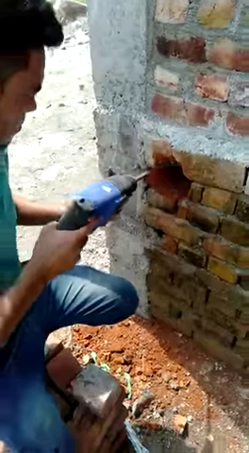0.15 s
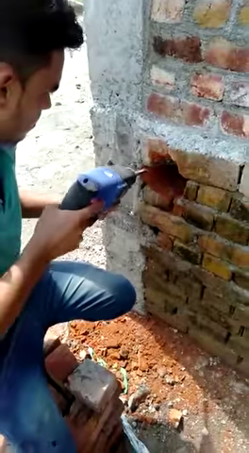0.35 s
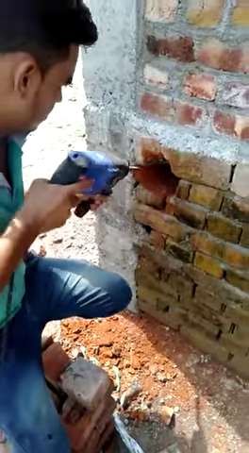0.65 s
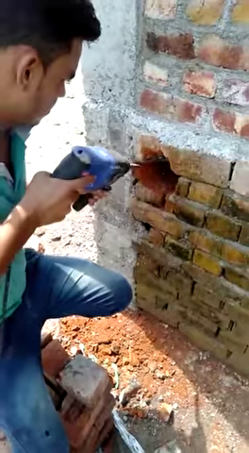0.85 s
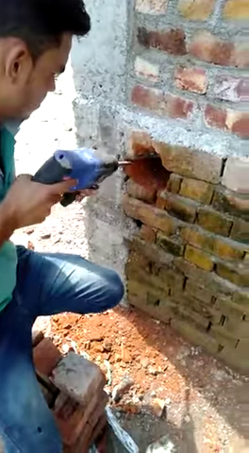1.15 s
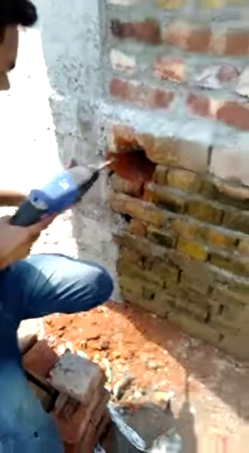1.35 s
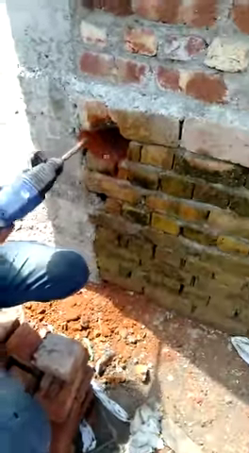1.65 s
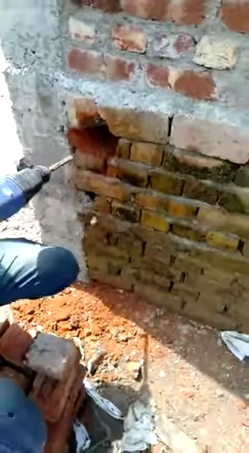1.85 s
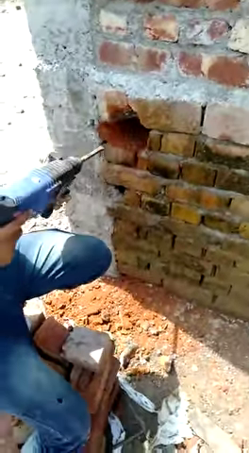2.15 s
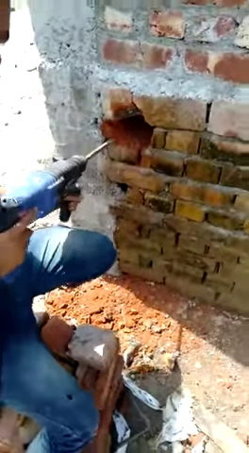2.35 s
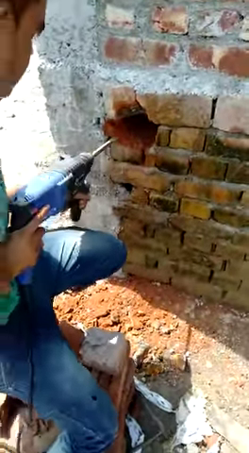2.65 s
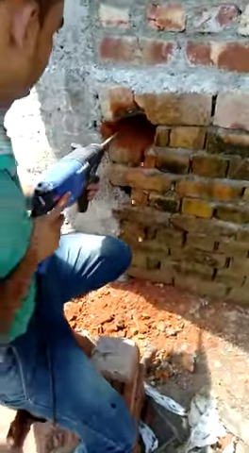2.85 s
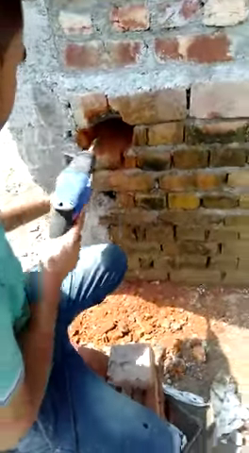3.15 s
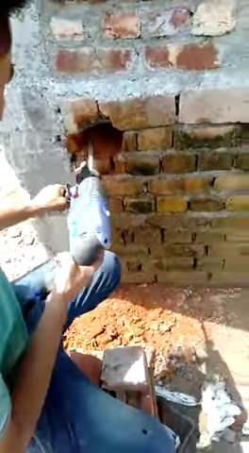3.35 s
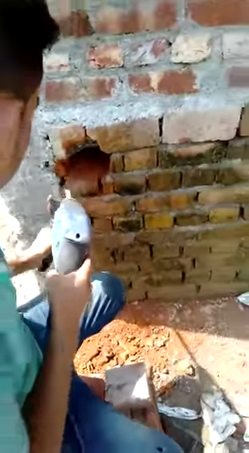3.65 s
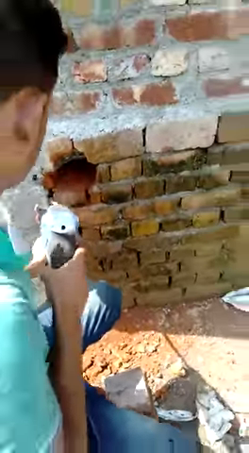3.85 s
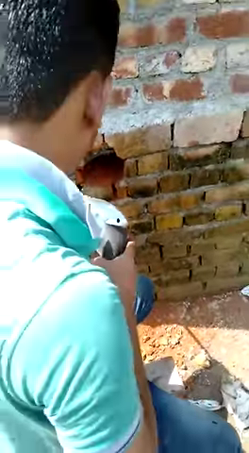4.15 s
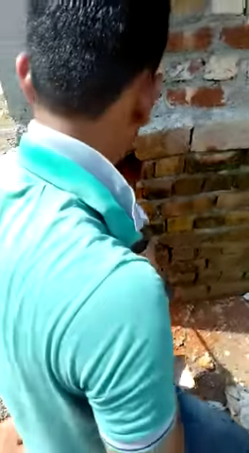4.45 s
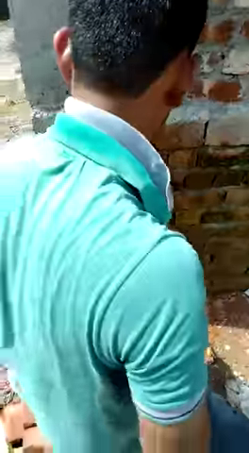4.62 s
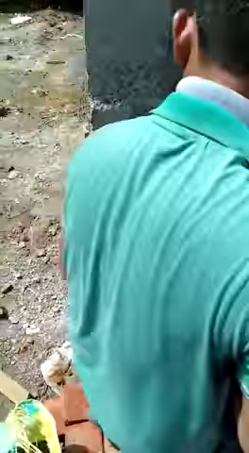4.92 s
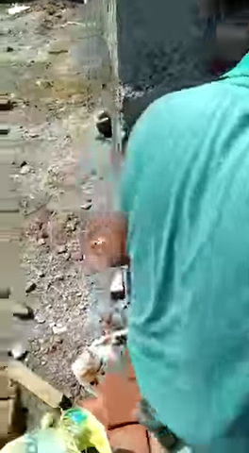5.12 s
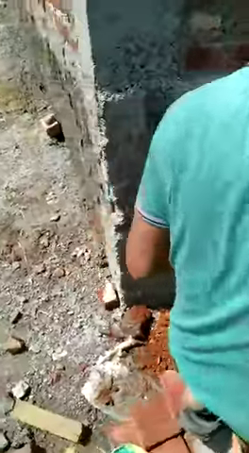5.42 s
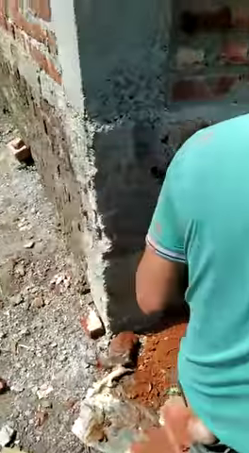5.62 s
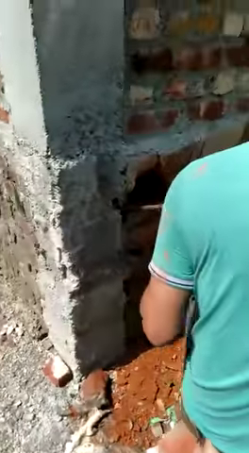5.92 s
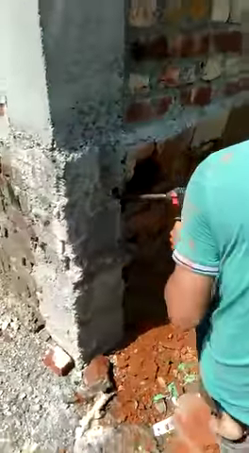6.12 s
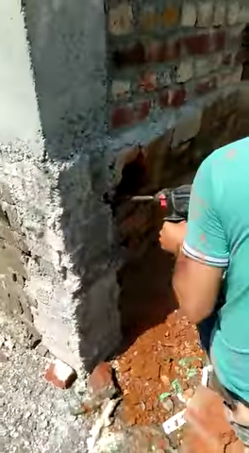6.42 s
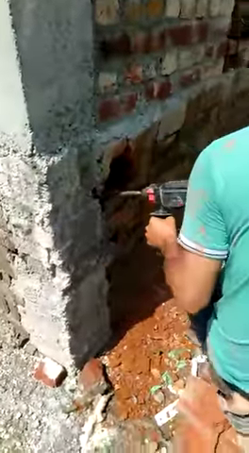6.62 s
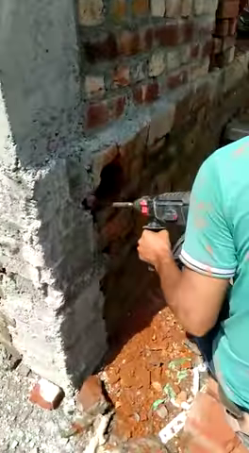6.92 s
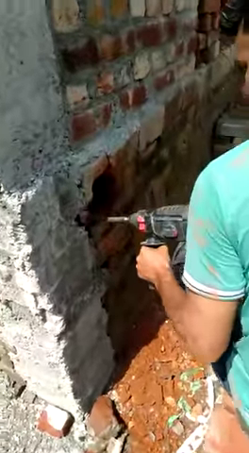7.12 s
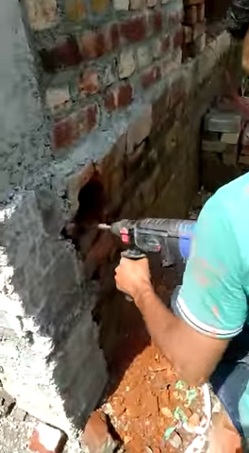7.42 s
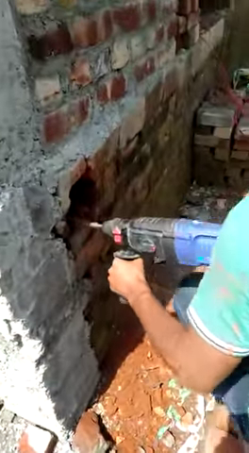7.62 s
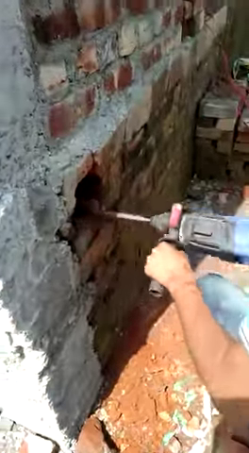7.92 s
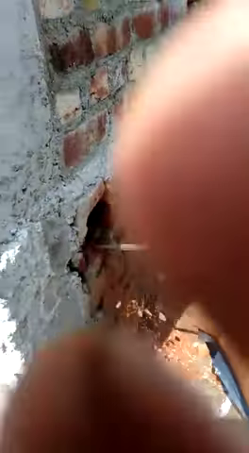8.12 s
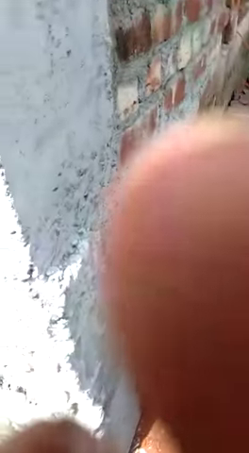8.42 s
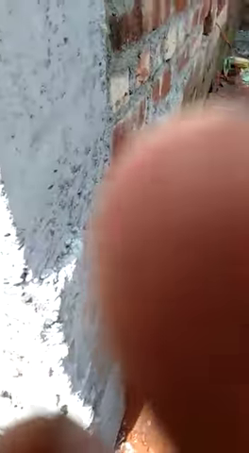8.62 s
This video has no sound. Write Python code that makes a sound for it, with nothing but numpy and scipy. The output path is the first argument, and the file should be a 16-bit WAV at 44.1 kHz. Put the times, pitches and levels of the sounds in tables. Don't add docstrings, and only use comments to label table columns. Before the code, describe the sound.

A handheld phone moves around an electric hammer drill on a brick wall in open air. Fast knocking, hard bit cracks and rattling gears slow, stop almost entirely, and surge again. The middle is labouring and muffled, with a faint gear whine and low gusts; then steady close chatter resumes. Release brings scattered clacks, a falling rattle, finger taps and a light breeze.

```python
import sys
import numpy as np
from scipy import signal
from scipy.fft import rfft, irfft, next_fast_len
from scipy.io import wavfile
from scipy.ndimage import uniform_filter1d

SR = 44100
rng = np.random.default_rng(int(sys.argv[2]) if len(sys.argv) > 2 else 0)


def int16_out(signal):
    q = np.round(np.clip(np.atleast_2d(signal).T, -1, 1) * 32767)
    wavfile.write(sys.argv[1], SR, q.astype(np.int16))


def voltage_ratio(decibels):
    exponent = np.asarray(decibels, float) / 20
    return 10 ** exponent


N = 386757
TIME = np.arange(N) / SR

# t/s, goal blow rate f/Hz, time constant/s
MOTOR = [(0, 67, .12), (.6, 65.7, .3), (1.2, 67, .2), (1.4, 30, .55), (1.68, 15, .25), (2.46, 68.5, .18),
         (2.85, 65.8, .08), (3.22, 51.5, .113), (3.88, 44, .33), (4.93, 79, .24), (5.33, 66.3, .17),
         (6.75, 65.9, .4), (7.43, 0, .75), (7.63, 14, .27)]
START_HZ, START_TURN = 36, 0.845
# t/s, lag/turns
LAG = [(0, -.05), (.15, 0), (.3, .25), (.65, .36), (1.4, .35), (1.7, .1), (1.9, -.05), (2.4, 0),
       (2.55, .28), (2.85, .09), (3.36, .09), (3.9, .03), (4.05, -.11), (4.35, -.29), (4.65, -.41),
       (5.2, -.49), (5.45, -.29)]
# t/s, share of repeating knock/0-1, crack above hiss level/dB, bite on brick level/dB
SEAT = [(0, 0.15, 12, 6), (.13, 0.1, 9, 4.5), (.3, 0.26, 5, 3), (.62, 0.68, 7.5, 4.5), (1.3, 0.75, 6, -2),
        (1.55, 0, 10.5, -0.5), (1.95, 0.02, 16, 19), (2.6, 0.24, 17, 9.5), (2.9, 0.25, 10.5, 4),
        (3.2, 0.23, 7, -4.5), (3.33, 0.25, 5, -3.5), (4.3, 0.12, 1, -4.5), (5.29, 0.34, 0, -7),
        (5.35, 0.3, 5, 2), (5.8, 0.33, 16, 7.5), (6.05, 0.56, 16, -1), (7.31, 0.6, 11.5, -0.2),
        (7.35, 0.02, 8, 1.5), (7.46, 0.38, 16, 7), (7.6, 0, 19.5, 6), (7.7, 0.33, 26, 11),
        (7.95, 0, 14, 22.5)]
# place/turn, level/dB
KNOCKS = [
    [(0.05, 12), (.08, -30), (-.17, 8), (0.5, 1.5), (.25, 11)],
    [(0.04, 11.5), (0.4, -14), (-.17, -0.5), (.15, 11), (0.7, 6.5)],
    [(0.03, 9.5), (-.2, 0.5), (-.145, -0.5), (0.4, -5), (.45, 5.5)],
]
STRIKE_TURN, BOUNCE_TURN = -0.09, 0.068
LATE_KNOCK_DB = -9
HUM_TOP_HZ, HUM_GRIP, HUM_BASE = 660, 1.0, 0.4
CASE_PER_BITE, CHUCK_PER_BITE = 0.02, 0.42
MISS_HZ, MISS_WIDTH_HZ, MISS_DB = 32, 5.6, (-9.5, -14.5, -39)
# t/s, knock above rattle level/dB
SLACK = [(0, 12), (.5, 0), (1.4, 20), (1.7, 6), (2.3, 7), (2.5, 5), (3.3, 9), (5.3, 2), (6, -19), (7.45, 0),
         (7.6, 7), (8.1, -3)]
SLACK_TURN, SLACK_DECAY_S = -0.39, 0.0022
# t/s, level/dB
DRILL_LEVEL = [(0.02, -31), (.07, -39), (0.19, -33), (1.41, -27.5), (1.95, -31.5), (2.34, -47.5), (2.42, -58.5),
               (2.51, -41.5), (2.55, -35), (3.27, -26.5), (3.33, -30), (5.29, -34), (5.35, -31), (7.13, -29),
               (7.55, -28.5), (7.75, -31.5), (8.28, -50.5), (8.35, -63), (8.77, -72)]
# t/s, length/s, level/dB
SKIDS = [
    (1.655, 0.065, -5.5),
    (3.318, 0.045, -4.5),
    (4.095, 0.15, -0.5),
    (5.24, 0.33, 2.5),
    (5.861, 0.088, -5),
    (6.415, 0.16, -5),
    (6.822, 0.048, -2.5),
    (7.497, 0.27, -8),
]
# low f/Hz, high f/Hz
BANDS_HZ = [(250, 1300), (1300, 3000), (3000, 9000), (9000, 17000)]
# (f/Hz, level/dB)
BESIDE = [
    (0, 0, [(264, -23), (330, -7.5), (398, -5), (463, 8), (530, 3), (596, -7.5), (663, -6)], [(470, -35), (800, 3.5), (862, -4), (930, 1), (1230, 6.5), (1460, -1.5), (1780, 1.5), (2250, 0.5), (2770, -3), (3100, -11.5), (4340, -11.5), (5110, -16.5), (6170, -9.5), (9940, -23.5), (12800, -24), (16000, -9)]),
    (1.55, 1, [(250, -14), (500, -6.5)], [(470, -36), (800, -3), (1020, -4.5), (2290, -10.5), (2660, -7.5), (3220, -9.5), (6570, -4.5), (9570, -11), (16000, 13)]),
    (2.48, 0, [(250, -4.5), (440, 5), (520, 15.5), (610, 1.5), (720, 3)], [(470, -39), (800, 14.5), (965, 13), (1700, 19), (2070, 25.5), (2730, 0.5), (4290, -4.5), (4990, -7), (6490, 0.5), (9570, -17), (12600, -1), (16000, 0)]),
]
BEHIND = [
    (3.291, 1, [(250, -16), (470, -7), (700, -9)], [(530, -36), (900, 0), (1700, 0), (1870, 1), (2030, 2), (2300, -6.5), (2680, -4.5), (3590, -6.5), (4250, -4), (4680, -7), (6720, -10), (8760, -32), (11700, -33.5), (15100, -21.5), (16000, -27)]),
]
AT_WALL = [
    (5.32, 2, [(250, -21), (400, -5.5), (468, -7.5), (535, -10), (600, -4.5), (670, -4)], [(470, -41), (800, -6), (1070, 3), (1340, -6), (1900, 3.5), (2380, -4), (4460, -22.5), (6330, -16), (10100, -27.5), (15000, -13), (16000, -8)]),
    (5.95, 2, [(250, -8.5), (330, -5), (398, -1.5), (463, 2.5), (530, -6.5), (600, 6), (663, 4.5), (730, 3.5)], [(470, -34), (800, 3), (1090, 4), (1260, -4), (1570, -8), (2050, -2), (2570, -14), (3140, -13), (3600, -19), (6740, -16), (10200, -38.5), (14500, -24.5), (16000, -21.5)]),
    (7.399, 1, [(250, -26), (390, -9.5), (480, -7.5), (580, -13.5), (700, -3.5)], [(470, -39), (800, -5.5), (1480, -5.5), (1660, -13.5), (2440, -13), (2910, -17.5), (5720, -11.5), (10700, -28.5), (12500, -24), (16000, -12)]),
]
SIDES = BESIDE + BEHIND + AT_WALL
# case knock level/dB, fan and chuck level/dB, ring of bit level/dB
BALANCE = [(-1.5, -2, 14.5), (-2.5, -5, 4), (-1.5, -0.5, 0), (-5, -4, -2), (0.9, -4.5, 6), (-2, -4, 2.5),
           (1.1, -6, 5)]
# f/Hz, width/Hz, boost level/dB
RINGS = [
    (458.7, 20, 4.5),
    (4267, 110, 7),
    (6700, 1100, 3),
]
# f/Hz, width/Hz
BIT_RING = (12650, 1000)
# f/Hz, delay/ms
ANSWER = [
    [(400, -6.5), (600, -4), (830, -2), (960, 0.2), (1400, -1.07), (1700, -3), (2000, -6), (2400, -4),
     (2600, -1.55), (3200, -0.3)],
    [(400, 4), (600, -3), (830, 3), (1150, -1.5), (1500, -0.33), (2000, 2.5), (2700, -0.4), (3200, 0.9)],
    [(400, 0.36), (600, 0.3), (830, -2), (1000, -3.5), (1200, -1.4), (1500, 0.4), (2000, 0.5), (2700, -1.1),
     (3200, 0.3)],
]
LEAD_S = 0.008
# t/s, centre f/Hz, above drill level/dB
WHINE = [(0, 1723, -1), (.9, 1748, -10), (1.75, 2170, -39), (1.88, 2120, -2), (1.95, 1795, -7),
         (2.03, 1473, -7), (2.15, 1650, -7), (2.5, 1500, -3), (2.56, 1950, 7), (2.63, 2150, -8),
         (2.75, 2150, -5), (3.1, 1300, -27), (3.22, 1090, 4), (3.3, 1150, -29), (3.45, 1678, -11),
         (4.1, 1680, -18), (5.1, 1670, -14), (5.6, 1880, -6), (7.3, 2070, -15), (7.8, 2000, -15),
         (7.84, 1950, -7), (7.88, 1820, -7), (7.92, 1560, -7), (7.96, 1470, 4), (8.04, 1530, -6),
         (8.13, 1520, 3), (8.155, 1490, -8), (8.18, 1460, 10.5), (8.21, 1520, -1), (8.27, 1540, 12),
         (8.31, 1500, 3), (8.36, 1480, -14)]
WHINE_THROB_DB, WHINE_TURN = 4.0, 0.16
# t/s, mesh f/Hz, level/dB, octave level/dB
MESH = [(3.2, 1765, -140, -140), (3.36, 1780, -61, -60), (3.47, 1760, -40, -51), (3.7, 1705, -38, -50),
        (4, 1672, -35, -58), (4.15, 1573, -57, -47.5), (4.55, 1518, -50, -44.5), (4.72, 1470, -39, -56),
        (4.88, 1462, -65, -40), (5, 1540, -58, -58), (5.15, 1600, -140, -140)]
# t/s, peak level/dB, body (1-3 kHz) relative level/dB
BLOWS = [(1.7492, -25, 8), (1.8507, -19.5, 1), (1.8816, -13, -1.5), (1.95, -17.5, -1), (2.018, -29, 1),
         (2.0656, -23, -1), (2.117, -21.5, -3.5), (2.2225, -33, -2), (2.326, -41.5, 11.5),
         (7.5926, -35, -19), (7.6738, -31, -12), (7.835, -20, -21), (7.8697, -15.5, -11), (7.8947, -21, -1),
         (7.95, -26, 0), (7.9795, -24.5, -1), (8.003, -31, 2), (8.031, -29, 1), (8.1224, -30.5, 3.5),
         (8.161, -42, 6), (8.2105, -38, 6)]
BLOW_TOP_DB, BLOW_TOP_SLOPE = -10, 0.4
# t/s, peak level/dB
COAST = [(7.574, -33), (7.593, -35), (7.626, -23), (7.631, -26), (7.646, -17), (7.674, -16), (7.69, -13),
         (7.713, -19), (7.738, -12), (7.793, -28), (7.825, -25), (1.541, -27), (1.652, -14), (1.686, -15),
         (1.708, -8.5), (1.726, -28), (1.771, -23), (1.796, -13), (1.822, -19), (1.905, -32), (1.937, -27),
         (1.987, -15)]
COAST_TOP_DB = -14
# t/s, peak level/dB, body relative level/dB, top (9-16 kHz) relative level/dB
SLAPS = [
    (0.0223, -11, -4, 6),
    (0.048, -8.5, -13, 12),
    (2.46, -20.5, -7, -2),
    (2.529, -37, 11, -13),
    (2.549, -20, 1, -2),
    (2.5612, -22.5, 7, 12),
    (7.8027, -20, -19, 20),
]
# t/s, peak level/dB, body relative level/dB, top relative level/dB
FINGERS = [(8.25, -42, -16, -24), (8.265, -34, -11, -1), (8.303, -17.5, -20, -16), (8.324, -24, -15, -4),
           (8.344, -21, -29, -4), (8.387, -33, -26, -7), (8.422, -28.5, -11, -7), (8.465, -40, -24, 4),
           (8.515, -41, -15, -2), (8.542, -25, -17, -5), (8.549, -31, -9, -11), (8.625, -47, -16, -1),
           (8.682, -36, -20, -2), (8.718, -40, -13, -5)]
# f/Hz, level/dB
SNAP = [(1000, -3.5), (3000, -9.5), (5000, 0), (9000, -10), (12000, -2), (15000, 12)]
CLICK_RISE_S = 0.00047
# t/s, level/dB
BREEZE = [(0, -36.5), (.7, -43), (1.3, -35.5), (1.6, -37.5), (2.4, -34), (2.66, -46), (3.28, -42),
          (3.36, -37), (5.3, -34), (6.1, -44.5), (7.4, -45), (7.55, -33.5), (8.5, -41.5), (8.65, -55),
          (8.77, -43)]
# start t/s, length/s, level/dB
GUSTS = [(2.382, 0.094, -33), (2.465, 0.16, -29.5), (3.359, 0.11, -29.5), (3.515, 0.08, -21),
         (3.59, .12, -20.5), (3.728, 0.038, -19), (3.78, 0.062, -18.5), (3.835, 0.037, -16),
         (4.004, 0.096, -29), (4.11, 0.09, -32), (4.212, 0.064, -23.5), (4.27, 0.067, -24.5),
         (4.36, 0.12, -22), (4.49, .06, -23.5), (4.752, 0.033, -32), (4.802, 0.057, -24),
         (4.92, 0.2, -26.5), (5.15, 0.023, -16), (5.269, 0.035, -29.5), (7.147, 0.031, -27),
         (7.757, 0.053, -27.5), (7.865, 0.08, -29), (8.069, 0.066, -27.5), (8.204, 0.061, -29.5),
         (8.342, 0.024, -26.5), (8.375, 0.03, -29.5), (8.42, 0.021, -35), (8.498, 0.061, -33.5),
         (4.575, 0.04, -19), (5.093, 0.025, -25), (5.62, .16, -35), (6.33, 0.059, -35), (6.55, 0.05, -36),
         (8.71, 0.03, -42), (8.742, 0.025, -29)]
GUST_RISE_S, GUST_FALL_S, GUST_SWELL_DB = 0.014, 0.018, -0.5
# f/Hz, level/dB
GUST = [(12, -43), (20, -21), (81, 0.5), (183, -0.5), (222, -3.5), (357, -15), (665, -50), (900, -34),
        (1170, -22), (1980, -120)]
# f/Hz, level/dB
RUMBLE = [(20, 3.0), (60, -5), (120, -6.5)]
WIND_SLAP = [(250, 7.0), (700, -20.0)]
DEEP = [(20, 7), (90, 3.0)]
SITE = [(200, -5), (400, -8), (700, -7), (1200, -16), (1700, -24), (4000, -28), (16000, -23)]
# t/s, length/s, level/dB
SHOVES = [
    (0.03, .1, -48),
    (3.42, 0.17, -30),
    (4.84, 0.076, -36),
    (6.001, .1, -48),
    (7.56, .09, -36),
    (8.582, 0.11, -45),
]
TOP_HZ = 15730


def hammer():
    drives = impacts()
    swings = [np.clip((TIME - side[0]) / 0.093 + 0.5, 0, 1) for side in SIDES[1:]]
    steps = [1] + swings + [0]
    out = np.zeros(N)
    for side, balance, come, leave in zip(SIDES, BALANCE, steps, steps[1:]):
        _, pattern, bass, colour = side
        case_db, fan_db, bit_ring_db = balance
        weight = np.sqrt(np.clip(come - leave, 0, 1))
        heard = np.flatnonzero(weight)
        span = slice(heard[0], heard[-1] + 1)
        delays = np.array(ANSWER[pattern]) + [0, 1000 * LEAD_S]
        rings = RINGS + [(*BIT_RING, bit_ring_db)]
        for drive, (lo, hi), db in zip(drives[pattern], BANDS_HZ, (case_db, 0, fan_db, 0)):
            h = response(bass + colour[1:], lo, hi, rings, delays)
            out[span] += voltage_ratio(db) * weight[span] * ring(drive[span], h)
    return np.roll(out, -int(LEAD_S * SR)) * voltage_ratio(drill_db())


def impacts():
    hz, turn = speed(), turns()
    share, crack_db, bite_db = curves(SEAT)
    miss = 1 / (1 + np.exp((hz - MISS_HZ) / MISS_WIDTH_HZ))
    per_bite = (CASE_PER_BITE, CHUCK_PER_BITE, 1)
    case_db, chuck_db, bit_db = (k * bite_db + db * miss for k, db in zip(per_bite, MISS_DB))
    strike = pulses(turn, STRIKE_TURN, 1.7, 0.00021)
    bounce = pulses(turn, BOUNCE_TURN, 2.1, 0.00096)
    chuck = voltage_ratio(chuck_db) * burst(strike + 0.3 * bounce, crack_db - 5.5, 0.0021, 2.4)
    bit = voltage_ratio(bit_db) * burst(strike + 0.78 * bounce, crack_db + 0.5, 0.0015, 2.9)
    pair = strike + pulses(turn, SLACK_TURN, 3.2, 0.0007)
    slack = flare(pair, curves(SLACK)[0], SLACK_DECAY_S, 0.27)
    low, high = (np.clip(grip * share, 0, 0.98) for grip in (1.15, 0.7))
    hum = np.clip(HUM_GRIP * share + HUM_BASE * (1 - miss), 0, 0.995)
    drives = []
    for knocks in KNOCKS:
        first, *late = [(-1) ** k * voltage_ratio(db) * pulses(turn, place, 0.96, 0.00003)
                        for k, (place, db) in enumerate(knocks)]
        train = first + sum(late)
        steady = unit(train / np.sqrt(hz))
        thud = unit((first + voltage_ratio(LATE_KNOCK_DB) * sum(late)) / np.sqrt(hz))
        loose = slack * burst(np.abs(train), crack_db - 26.5, 0.0055, 2.66)
        walls = np.sqrt(hum) * thud + np.sqrt(1 - hum) * loose
        upper_walls = np.sqrt(low) * thud + np.sqrt(1 - low) * loose
        case = voltage_ratio(case_db) * split(walls, upper_walls)
        gears = np.sqrt(high) * steady + np.sqrt(1 - high) * loose
        drives.append([case, gears, chuck, bit])
    return drives


def speed():
    hz, now = np.empty(N), START_HZ
    for s, goal, lag_s in MOTOR:
        i = int(s * SR)
        now = hz[i - 1] if i else now
        hz[i:] = goal + (now - goal) * np.exp(-(TIME[i:] - s) / lag_s)
    return hz


def turns():
    return START_TURN + np.cumsum(speed()) / SR - curves(LAG)[0]


def drill_db():
    skids = sum(db * np.exp(-(2 * (TIME - s) / length) ** 2) for s, length, db in SKIDS)
    return curves(DRILL_LEVEL)[0] + skids


def whine():
    hz, above_db = curves(WHINE)
    phase = 2 * np.pi * np.cumsum(hz) / SR
    narrow = walk(240) * np.cos(phase) + walk(240) * np.sin(phase)
    flutter = voltage_ratio(3 * walk(40)) * narrow
    throb = voltage_ratio(WHINE_THROB_DB * np.cos(2 * np.pi * (turns() - WHINE_TURN)))
    return voltage_ratio(drill_db() + above_db) * unit(throb * flutter)


def mesh():
    hz, *levels_db = curves(MESH)
    phase = 2 * np.pi * np.cumsum(hz * (1 + 0.00405 * walk(25))) / SR
    return sum(np.sqrt(2) * voltage_ratio(db + 4.3 * walk(14)) * np.sin((k + 1) * phase)
               for k, db in enumerate(levels_db))


def sway(x, patchy_db, rate, count=14):
    size = next_fast_len(N)
    hz = np.arange(size // 2 + 1) * SR / size
    strip = np.clip(np.log2(hz / 700 + 1e-9) * count / 4.5, 0, count)
    spectrum = rfft(x, size)
    out = np.zeros(N)
    for k in range(count + 1):
        part = irfft(spectrum * np.clip(1 - np.abs(strip - k), 0, 1), size)[:N]
        out += voltage_ratio(patchy_db * min(k / 4, 1) * walk(rate)) * part
    return out


def clicks():
    out = np.zeros(N + 2000)
    fade = np.arange(1500) / SR
    rise = 1 - np.exp(-fade / CLICK_RISE_S)
    shapes = [response(SNAP, lo, hi, size=1024) for lo, hi in [(750, 3430)] + BANDS_HZ[2:]]
    coast = [(s, db - 11.0, 6.0, COAST_TOP_DB) for s, db in COAST]
    blows = [(s, db, body, BLOW_TOP_DB + BLOW_TOP_SLOPE * (db + 22)) for s, db, body in BLOWS]
    fingers = [(s, db - 1.0, body, top + 6) for s, db, body, top in FINGERS]
    for s, db, body_db, top_db in blows + SLAPS + fingers + coast:
        i = int(s * SR)
        snap_db = min(-2.5, -top_db - 8)
        levels_db = (body_db + 0.5, snap_db, top_db)
        for h, rel_db, decay_s in zip(shapes, levels_db, (0.004, 0.002, 0.0015)):
            grit = rng.standard_normal(len(fade)) * np.exp(-fade / decay_s) * rise
            out[i:i + len(fade)] += voltage_ratio(db + rel_db - 3.5) * np.convolve(grit, h)[:len(fade)]
    return out[:N]


def wind():
    level_db = wind_db()
    puffs = voltage_ratio(3.3 * walk(60)) * rng.standard_normal(N)
    rumble = unit(ring(puffs, response(RUMBLE, 37.6, 149.5)))
    thump = unit(ring(puffs, response(GUST, 131.4, 990)))
    slap = unit(ring(puffs * np.abs(puffs), response(WIND_SLAP, 280, 970)))
    thump_db = -3.0 + 0.33 * (level_db + 29.5)
    slap_db = -24.5 + 0.94 * (level_db + 40.5)
    air = 0.87 * rumble + voltage_ratio(thump_db) * thump + voltage_ratio(slap_db) * slap
    air = air + 0.08 * (air ** 2 - uniform_filter1d(air ** 2, 2000))
    return voltage_ratio(level_db - 3.0) * air


def wind_db():
    gusts = np.zeros(N)
    for s, length, db in GUSTS:
        swell_db = GUST_SWELL_DB * np.clip((TIME - s) / length - 0.5, -0.5, 0.5)
        rise = (TIME - s) / GUST_RISE_S + 0.5
        fall = (s + length - TIME) / GUST_FALL_S + 0.5
        gusts += voltage_ratio(db + swell_db) * np.clip(np.minimum(rise, fall), 0, 1)
    return 20 * np.log10(np.hypot(voltage_ratio(curves(BREEZE)[0]), gusts))


def shoves():
    deep = unit(ring(rng.standard_normal(N), response(DEEP, 19.5, 75.0)))
    return deep * sum(voltage_ratio(db) * np.exp(-(2 * (TIME - s) / length) ** 2) for s, length, db in SHOVES)


def site():
    return voltage_ratio(-61) * ring(rng.standard_normal(N), response(SITE, 134, 17000))


def pulses(turn, place, spread_db, jitter_s):
    k = np.arange(1, int(turn[-1]))
    size, lag = rng.standard_normal((2, len(k)))
    at = np.clip(np.interp(k + place, turn, np.arange(N)) + jitter_s * SR * lag, 0, N - 2)
    out, i = np.zeros(N), at.astype(int)
    np.add.at(out, i, voltage_ratio(spread_db * size) * (1 - at + i))
    np.add.at(out, i + 1, voltage_ratio(spread_db * size) * (at - i))
    return out


def flare(clicks, above_db, decay_s, flicker_db):
    tails = signal.lfilter([1], [1, -np.exp(-1 / (decay_s * SR))], clicks)
    gate = voltage_ratio(flicker_db * walk(30)) + voltage_ratio(above_db) * tails
    return gate / np.sqrt(uniform_filter1d(uniform_filter1d(gate ** 2, 2500), 2500))


def burst(clicks, above_db, decay_s, flicker_db):
    return flare(clicks, above_db, decay_s, flicker_db) * rng.standard_normal(N)


def split(below, above):
    low_pass = signal.butter(3, HUM_TOP_HZ, fs=SR, output="sos")
    return above + signal.sosfiltfilt(low_pass, below - above)


def response(points, lo_hz, hi_hz, rings=(), delays=((1, 0),), size=4096):
    hz = np.arange(size // 2 + 1) * SR / size + 1
    points = np.array(points)
    db = np.interp(np.log(hz), np.log(points[:, 0]), points[:, 1])
    db = db + sum(boost / (1 + (2 * (hz - f) / width) ** 2) for f, width, boost in rings)
    power = voltage_ratio(2 * db) / ((1 + (lo_hz / hz) ** 12) * (1 + (hz / hi_hz) ** 12))
    cep = irfft(np.log(power + 1e-7 * power.max()) / 2)
    cep[1:size // 2] *= 2
    cep[size // 2 + 1:] = 0
    late_s = np.interp(hz, *np.transpose(delays)) / 1000
    late_phase = 2 * np.pi * np.cumsum(late_s) * SR / size
    h = irfft(np.exp(rfft(cep) - 1j * late_phase))
    return h / np.sqrt(np.sum(h ** 2))


def ring(x, h):
    return signal.oaconvolve(x, h)[:len(x)]


def walk(rate):
    k = int(SR / rate)
    held = np.repeat(rng.standard_normal(N // k + 1), k)
    return unit(uniform_filter1d(uniform_filter1d(held, k), k)[:N])


def curves(table):
    s, *columns = np.transpose(table)
    return [np.interp(TIME, s, c) for c in columns]


def unit(x):
    return x / np.sqrt(np.mean(x ** 2))


def scene():
    near = sway(hammer(), 2.5, 6.0) + whine() + mesh()
    ground = voltage_ratio(-31.5) * np.roll(near, int(0.00113 * SR))
    wall = voltage_ratio(-17.5) * np.roll(near, int(0.0074 * SR))
    return (near + ground + wall + clicks() + wind() + site() + shoves())[None]


def top_cut(x):
    return signal.sosfilt(signal.ellip(10, 0.2, 52, TOP_HZ, fs=SR, output="sos"), x)


def band_limit(x):
    return signal.sosfilt(signal.butter(12, 16970, fs=SR, output="sos"), x)


def record(dry):
    rounded = 0.43 * np.tanh(dry / 0.44)
    mix = top_cut(rounded)
    return band_limit(mix)


dry = scene()
out = record(dry)
int16_out(out)
```